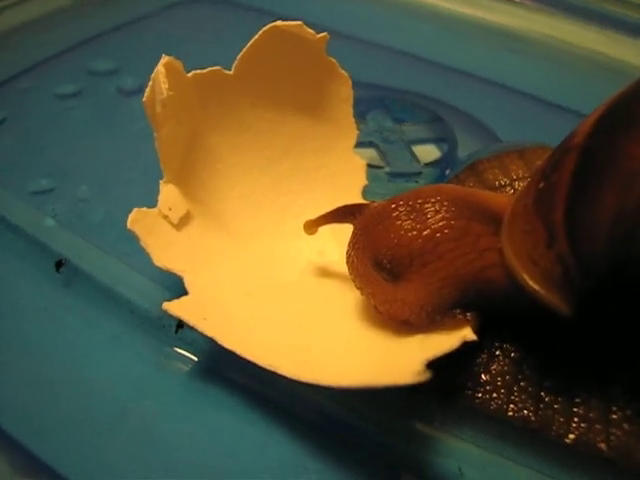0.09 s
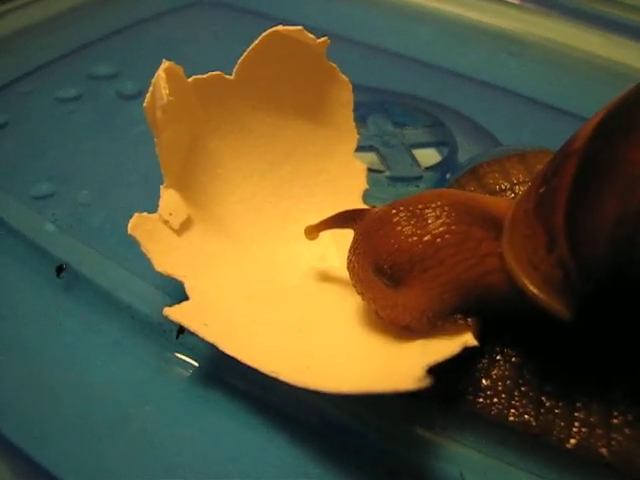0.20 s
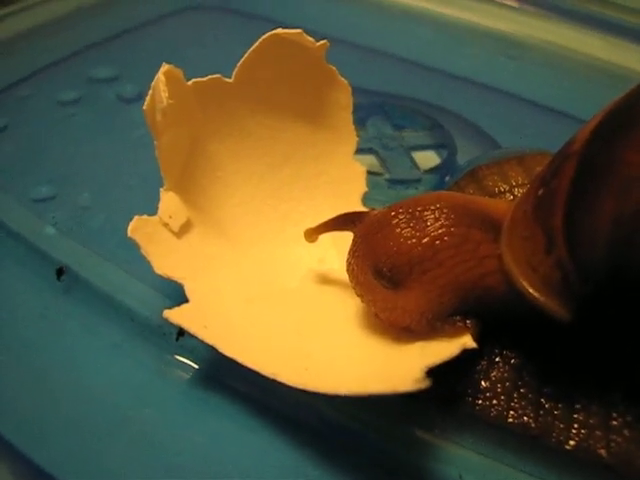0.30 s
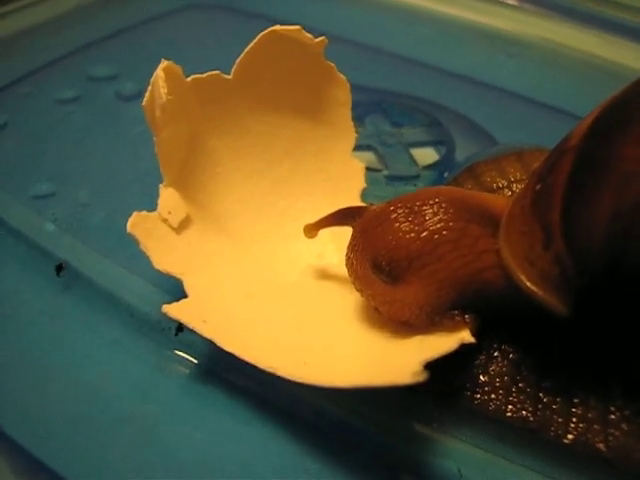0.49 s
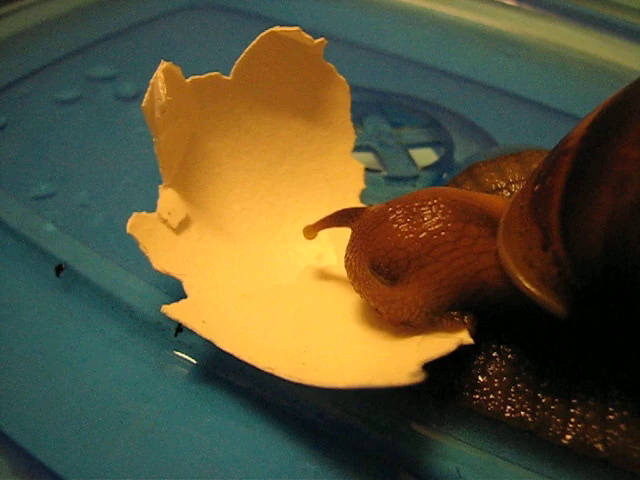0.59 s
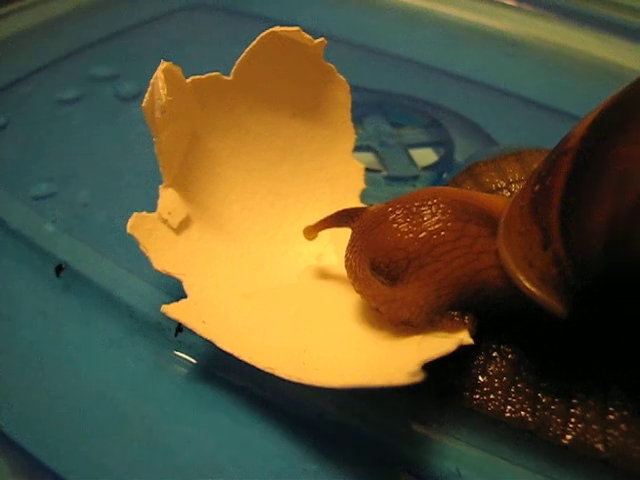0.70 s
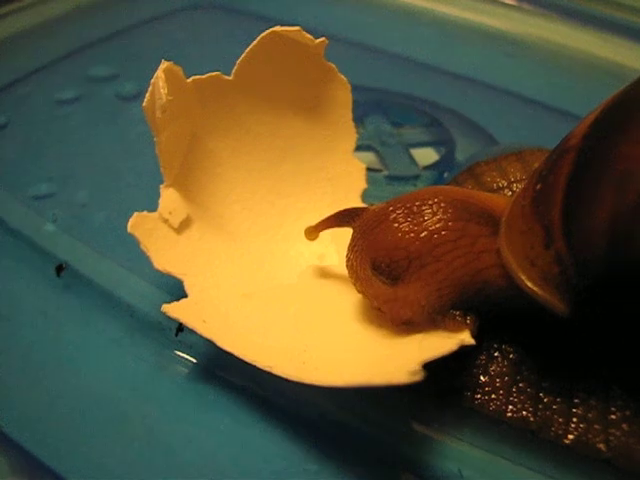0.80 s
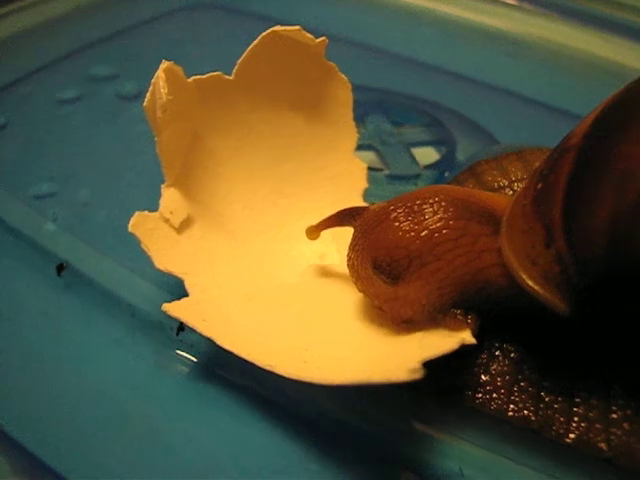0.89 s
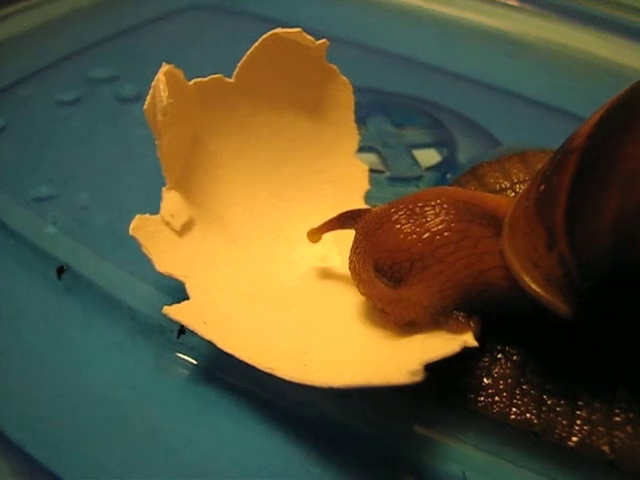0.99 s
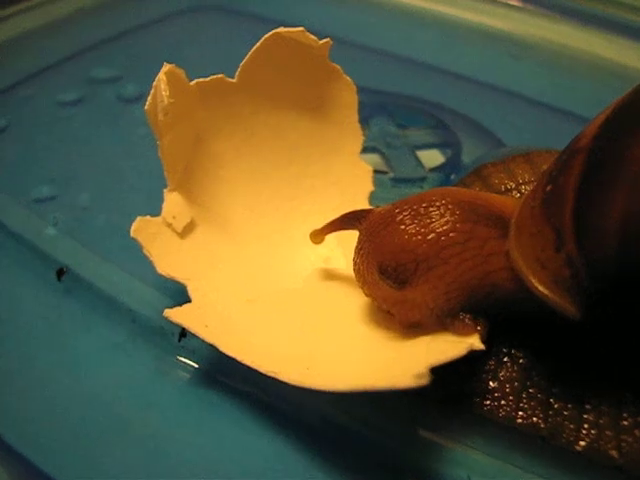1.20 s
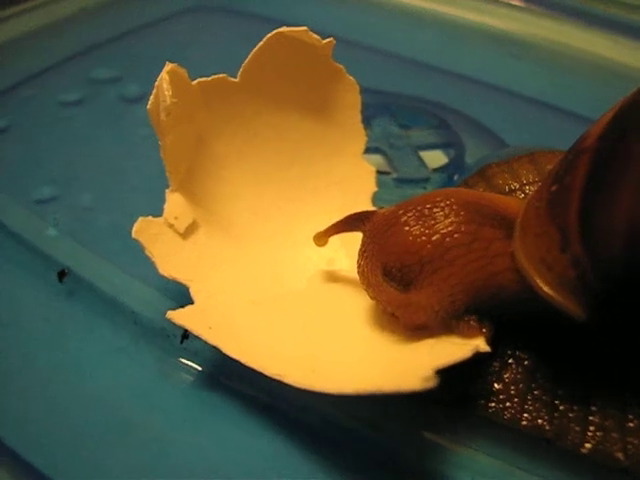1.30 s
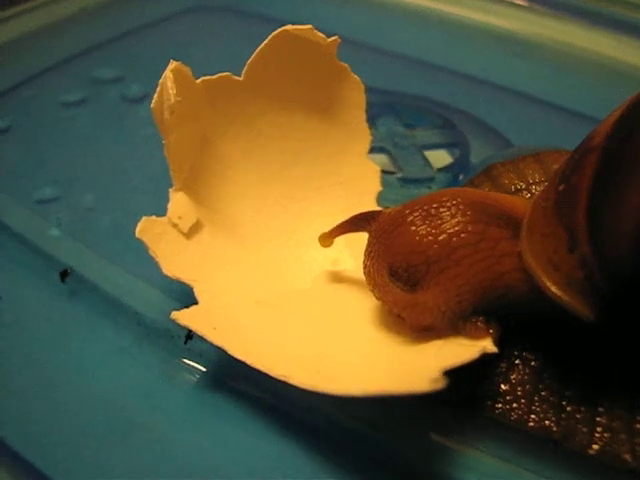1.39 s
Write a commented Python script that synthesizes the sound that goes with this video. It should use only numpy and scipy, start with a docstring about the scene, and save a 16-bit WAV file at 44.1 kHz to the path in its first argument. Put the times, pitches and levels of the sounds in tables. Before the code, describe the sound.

A snail rasps an eggshell: dry, sharp crackling snaps in clusters over hiss and thin whine

```python
"""Hiss, a low hum and two thin whines lie under faint scratching and rattling; then sharp snaps come in clusters.
A snail rasps an eggshell lying in a plastic dish, close to a small camera: its teeth slip and ring the shell.
The shell knocks on the dish, whose own modes answer; soft low throbs and dull thuds lie beneath.
Blows are sums of decaying sines, scratching and rattling are random showers of small blows,
hiss and hum are shaped noise, and the camera's whines restart their phase with every picture."""
import sys
import numpy as np
from scipy import signal
from scipy.io import wavfile
from scipy.ndimage import uniform_filter1d

SR = 44100
rng = np.random.default_rng(int(sys.argv[2]) if len(sys.argv) > 2 else 0)


def wav_out(sig):
    """Save sig, one row per channel (or a flat mono array), as 16-bit PCM at SR to the path in sys.argv[1]."""
    wavfile.write(sys.argv[1], SR, np.round(np.clip(np.atleast_2d(sig).T, -1, 1) * 32767).astype(np.int16))


def gain_from_db(level_db):
    """Convert decibel levels to linear amplitude factors (20 dB per decade)."""
    decades = np.asarray(level_db, float) / 20
    return 10 ** decades


N = 61740

# modes of the eggshell:
# (frequency [Hz], level [dB], t60 [s], left-right difference [dB], left phase lead [rad])
SHELL_MODES = [(1795, -10, 0.0066, 3.5, 0.46), (2060, -7, 0.009, 0, 0.27), (2977, -4.5, 0.0082, -5.5, 0.92),
               (3350, -3, 0.011, -5.5, 0.65), (4047, -11.5, 0.0062, -2, .4), (4830, -7.5, 0.0048, -3, 0.55),
               (5274, -5.5, 0.0059, -3.5, 0.58), (6215, 0, 0.0083, -1.5, .9),
               (6455, -4, 0.0063, -13.5, 0.78), (6990, -6.5, 0.0065, 6.5, 0.61),
               (9080, 3.5, 0.0042, -5.5, 0.81), (9720, -5.5, 0.0061, -1, 1.1), (12870, -5, 0.0039, 7, 1.6),
               (14100, -13.5, 0.0056, 9, 1.3)]
# modes of the plastic dish:
# (frequency [Hz], level [dB], t60 [s], left-right difference [dB], left phase lead [rad])
DISH_MODES = [(160, -8.5, 0.042, -7, 1.05), (270, -18, 0.013, -10, 0.25), (386.4, -10, 0.061, 8, 0.41),
              (600.4, -4.5, 0.051, 8, 1.55), (745, -6, 0.015, -11, 0.94), (994, 0, 0.029, -7.5, 1.78),
              (1051, -5, 0.016, -17, 0.81), (1314, -9, 0.015, -8, 1.2), (1900, -8, 0.013, 4, 0.39),
              (2900, -5.5, 0.0088, -7, 0.17), (3220, -3.5, 0.0049, -23.5, 0.45),
              (3540, -13, 0.011, -5, 0.37), (5120, -1, 0.0041, -12, 0.34), (6700, -3, 0.0038, -14, 0.26)]
# random variation from blow to blow: relative detuning and level scatter of each mode
LOOSE_DETUNE, LOOSE_SCATTER_DB = 0.011, 2.2  # snaps, scratching, rattling
FIRM_DETUNE, FIRM_SCATTER_DB = 0.01, 1  # knocks, throbs, thuds


def evened(x):
    """Scales to rms 1."""
    return x / np.sqrt(np.mean(x ** 2) + 1e-20)


def read(points, hz):
    """Reads a spectrum on a log frequency axis."""
    f, value = np.transpose(points)
    return np.interp(np.log(hz + 1), np.log(f + 1), value)


def ring(modes, extra_db, detune, scatter_db):
    """One blow: decaying sines that differ a little from blow to blow and between the microphones."""
    mic_detune, mic_phase_rad, contact_s = 0.004, 0.2, 0.00025
    hz, db, t60, pan_db, *lead = np.transpose(modes)[:, :, None]
    luck = rng.standard_normal((6, len(modes), 1))
    t = np.arange(round(0.12 * SR)) / SR
    out = []
    for side, sign in enumerate((0.5, -0.5)):  # left, right
        f = hz * (1 + detune * luck[0] + mic_detune * luck[1 + side])
        decay_db = -60 * t / np.maximum(t60, 0.001)
        level = gain_from_db(db + extra_db + sign * pan_db + scatter_db * luck[3] + decay_db)
        phase = sign * sum(lead) + mic_phase_rad * luck[4 + side]
        out.append((level * np.sin(2 * np.pi * f * t + phase)).sum(0))
    return np.array(out) * (1 - np.exp(-t / contact_s))  # soft onset


def add(mix, s, sound):
    """Mixes a sound in at time s."""
    part = mix[:, round(s * SR):][:, :sound.shape[1]]
    part += sound[:, :part.shape[1]]


def patter(modes, extra_db, curve, per_s, spread_db, count):
    """A shower of small blows at random moments, of count kinds; their least level follows a curve."""
    least_db = np.interp(np.arange(N) / SR, *np.transpose(curve))
    size = gain_from_db(least_db + spread_db * np.minimum(rng.exponential(1, N), 3))
    struck = rng.random(N) < per_s / SR
    size = size * struck * rng.choice([-1, 1], N)
    kind = rng.integers(0, count, N)
    out = np.zeros((2, N))
    for k in range(count):
        blow = ring(modes, extra_db, LOOSE_DETUNE, LOOSE_SCATTER_DB)
        out += signal.oaconvolve((size * (kind == k))[None], blow, axes=1)[:, :N]
    return out


def shell_colour(low_db, mid_db, high_db):
    """Gain of each shell mode for given shares of low, middle and high modes."""
    hz = np.array(SHELL_MODES)[:, :1]
    middle = (hz > 3700) * (hz < 5800)
    return low_db * (hz < 3700) + mid_db * middle + high_db * (hz > 8200)


def dish_colour(bass_db, upper_db, crack_db):
    """Gain of each dish mode for given shares of bass, upper body and crack."""
    hz = np.array(DISH_MODES)[:, :1]
    upper = (hz > 800) * (hz < 1800)
    return bass_db * (hz < 300) + upper_db * upper + crack_db * (hz > 1800)


def hiss():
    """Room and camera hiss: slightly patchy noise, more alike in both channels in the bass."""
    # noise spectrum before overall levelling: (frequency [Hz], relative density [dB per Hz])
    spectrum = [(12, -51), (25, -32), (60, -11), (100, -4), (200, -10.5), (300, -5.5), (500, -11),
                (630, -8.5), (1000, -13), (1900, -13.5), (4000, -15.5), (6300, -18), (7000, -17.5),
                (8300, -12.5), (9000, -19), (12000, -23.5), (15000, -24.5), (16400, -34)]
    # left-right likeness: (frequency [Hz], correlation [0 to 1])
    likeness = [(60, 0.78), (290, 0.69), (640, 0.54), (1400, 0.29), (3100, 0.24), (15000, 0.046)]
    total_db, patch_db = -49, 1.5
    frames, hz = N // 256 + 5, np.fft.rfftfreq(1024, 1 / SR)
    a, b, c, d, patches = rng.standard_normal((frames, 513, 5)).T
    patches = uniform_filter1d(patches, size=12, axis=0)  # over frequency
    patches = evened(uniform_filter1d(patches, size=10, axis=1))  # over time
    same = np.clip(read(likeness, hz), -1, 1)[:, None]
    left, other = a + 1j * b, c + 1j * d
    z = np.array([left, same * left + np.sqrt(1 - same ** 2) * other])
    z = z * gain_from_db(read(spectrum, hz)[:, None] + patch_db * patches)
    noise = signal.istft(z, nperseg=1024, noverlap=768)[1][:, :N]
    return gain_from_db(total_db) * evened(noise)


def hum():
    """A fuzzy low hum, stronger on the left: smoothed noise shifted up to the hum's pitch."""
    pitch_hz, pole_width_hz, level_db, pan_db = 402, 61, -60, 13
    turn = np.exp(2j * np.pi * pitch_hz * np.arange(N) / SR)
    r = np.exp(-np.pi * pole_width_hz / SR)
    smooth = signal.lfilter([1], [1, -2 * r, r * r], rng.standard_normal(N) / turn)
    fuzz = (turn * smooth).real
    return gain_from_db(level_db + pan_db * np.array([[0.5], [-0.5]])) * evened(fuzz)


def whines():
    """Thin camera tones whose phase starts afresh with every picture; the second blips as it restarts."""
    # restarting tones: (frequency [Hz], picture rate [per s], first restart [s])
    tones = [(7867.13, 29.97, .0223), (8260, 30, .0072)]
    # their stereo placing: (left peak [dB], right peak [dB], left phase lead [rad])
    placing = [(-48.2, -46.2, 0), (-56, -55, 2.4)]
    blip_hz, blip_db, blip_s = 8600, -54, 0.0012
    t, out = np.arange(N) / SR, 0
    for (hz, per_s, first), (left_db, right_db, lead) in zip(tones, placing):
        age = (t - first) % (1 / per_s)  # time since the last restart
        turn = 2 * np.pi * hz * age
        out = out + np.array([gain_from_db(left_db) * np.cos(turn + lead), gain_from_db(right_db) * np.cos(turn)])
    # signed time from the nearest restart of the second whine
    near = np.minimum(age, 1 / per_s - age) * np.sign(0.5 / per_s - age)
    blip = gain_from_db(blip_db) * np.exp(-(near / blip_s) ** 2) * np.cos(2 * np.pi * blip_hz * near)
    return out + np.array([blip, -blip])  # opposite polarity in the two channels


def scratching():
    """Faint scratching between the snaps: a shower of small blows that ring the shell."""
    # least blow level: (time [s], level [dB])
    strength = [(0, -48), (.17, -55), (.23, -46), (.3, -44), (.36, -41.5), (.38, -52), (.46, -47),
                (.6, -52), (.62, -45), (.645, -42), (.68, -50.5), (.8, -55.5), (1.0, -59), (1.04, -56),
                (1.08, -53), (1.12, -67), (1.16, -58.5), (1.4, -69)]
    colour_db = shell_colour(-5, 2, -9.5)
    return patter(SHELL_MODES, colour_db, strength, per_s=450, spread_db=2.6, count=12)


def rattling():
    """The dish rattles faintly: a shower of small blows that ring its modes, with little crack."""
    # least blow level: (time [s], level [dB])
    strength = [(0, -50.5), (.06, -58.5), (.58, -65), (.62, -56.5), (.7, -54), (0.759, -57.5), (.82, -64),
                (1.4, -64)]
    colour_db = dish_colour(-3.5, 1.5, -24)
    return patter(DISH_MODES, colour_db, strength, per_s=400, spread_db=2, count=8)


def throbs():
    """Soft throbs near the pitch of the hum, about ten a second at first, each a short low ring."""
    # single throbs: (time [s], level [dB])
    pulses = [(.002, -39.5), (.104, -39), (.203, -37), (.303, -42), (.345, -42), (.404, -34), (.721, -36),
              (.783, -38), (1.053, -42)]
    # modes of one throb: (frequency [Hz], level [dB], t60 [s], left-right difference [dB])
    throb_modes = [(395.3, -1.5, 0.081, 8.5), (315, -25, 0.026, -8), (475, -28, 0.017, -12)]
    out = np.zeros((2, N))
    for s, db in pulses:
        add(out, s, ring(throb_modes, db, FIRM_DETUNE, FIRM_SCATTER_DB))
    return out


def knocks():
    """The shell knocks on the dish; each knock rings it with more or less bass, upper body and crack."""
    # single knocks: (time [s], level [dB], bass [dB], upper body [dB], crack [dB])
    hits = [(0.023, -40.5, -14, 2.5, -9), (0.5076, -43, 6, -6, -5), (0.6149, -39.5, -11, 3, -6),
            (.636, -44, -10, 7.5, 7), (0.648, -45, -5, 5.5, -8), (.668, -38.5, -18, 5.5, 1),
            (.6915, -34.5, -18, 2, -5), (0.7018, -39, -9, 7, -25), (0.7376, -28.5, 0.5, 0, -2.5),
            (0.7784, -27, -1, 3.5, 4), (1.052, -45.5, -8, 4.5, -8), (1.245, -54, 4, -1, -15)]
    out = np.zeros((2, N))
    for s, db, *colour_db in hits:
        add(out, s, ring(DISH_MODES, db + dish_colour(*colour_db), FIRM_DETUNE, FIRM_SCATTER_DB))
    return out


def snaps():
    """Each tooth slipping on the shell sets its modes ringing, in a colour of its own."""
    # single slips: (time [s], level [dB], low modes [dB], middle modes [dB], high modes [dB])
    slips = [(0.1874, -38.5, -1, 1, -1), (0.2237, -32, -1.5, -14, -7), (0.2344, -16.5, -10.5, -1, -10.5),
             (0.2544, -34, 0, 11, -8), (.2669, -32, -5, 1, -1.5), (0.2798, -22, -23, -2, -16),
             (0.3063, -29.5, -5.5, 6, -7), (0.3098, -30, -5, -9, -10), (0.3129, -22.5, -25, -1, -19),
             (0.3161, -30.5, -13, 10, -18), (0.3202, -37, -6, -2, -12), (0.3396, -28, -17, -4, -14),
             (0.3452, -14.5, -14.5, -2.5, -19), (0.349, -37, -3, -12, -21), (.3748, -36, -2, -4, -15),
             (.3901, -18.5, -5, 10.5, -2.5), (0.3924, -19.5, -14, -6, -25), (0.4248, -21, -12, -5, -11.5),
             (0.4484, -24, 0, 0, -8), (.4607, -36, -3, -3, -12), (0.4703, -19.5, -9.5, -12, -12),
             (0.4733, -35, -5, -8, -14), (0.4769, -18.5, -10, -4, -8.5), (0.4974, -25.5, -2.5, -10, -16),
             (0.509, -17.5, -7.5, -8, -13), (0.5152, -22, -11, -20, -19), (0.523, -33.5, -2, -9, -16),
             (0.5459, -22.5, -7, -3, -6.5), (.5566, -29, -8, 0, -11), (0.562, -32, -3, -6, -7),
             (.5844, -23.5, -5, -7, -13), (0.6099, -7.5, -9.5, -14, -25), (.6115, -11.5, -8, 8, -13),
             (0.6128, -12.5, -6, 6.5, -15), (0.622, -49, -5, 1, -23), (0.6284, -25, -3, -12, -14),
             (0.6289, -15, -21, 2, -15), (.745, -34, -17, -5, -4), (1.033, -36.5, -20, -5, -18),
             (1.1036, -20, -18.5, -5.5, -19), (1.1114, -32, -31, 5, -11), (1.1129, -26.5, -5, -2, -10)]
    out = np.zeros((2, N))
    for s, db, *colour_db in slips:
        add(out, s, ring(SHELL_MODES, db + shell_colour(*colour_db), LOOSE_DETUNE, LOOSE_SCATTER_DB))
    return out


def thuds():
    """Dull thuds, mostly on the right, each one low, quickly damped swing."""
    # single thuds: (time [s], level [dB], pitch [Hz])
    bumps = [(0.202, -48, 233), (0.691, -53, 322), (1.054, -36.5, 131), (1.267, -38.5, 168),
             (1.349, -38.5, 270)]
    t60_s, pan_db = 0.029, -7
    out = np.zeros((2, N))
    for s, db, hz in bumps:
        add(out, s, ring([(hz, db, t60_s, pan_db)], 0, FIRM_DETUNE, FIRM_SCATTER_DB))
    return out


def room(x):
    """Short scatter from the dish walls and the table: a decaying noise tail."""
    level_db, t60_s = -18, 0.1
    t = np.arange(round(0.15 * SR)) / SR
    tail = rng.standard_normal((2, len(t))) * gain_from_db(-60 * t / t60_s) * (t > 0.001)
    tail = tail / np.linalg.norm(tail[0])
    return gain_from_db(level_db) * signal.oaconvolve(x, tail, axes=1)[:, :N]


def scene():
    """Shell and dish sounds, throbs and thuds with their scatter, over the steady floor."""
    near = scratching() + rattling() + throbs() + knocks() + snaps() + thuds()
    low_cut = signal.butter(3, 105, "high", fs=SR, output="sos")
    near = signal.sosfilt(low_cut, near)
    return near + room(near) + hiss() + hum() + whines()


def roll_off(x):
    """The treble ends steeply here."""
    return signal.sosfilt(signal.butter(12, 16500, fs=SR, output="sos"), x)


def record(dry):
    """Limits the band with a steep low-pass at 16.3 kHz and finishes the mix."""
    low_pass = signal.firwin(511, 16300, window=("kaiser", 9), fs=SR)
    mix = signal.oaconvolve(dry, low_pass[None], "same")
    return roll_off(mix)


dry = scene()
out = record(dry)
wav_out(out)
```